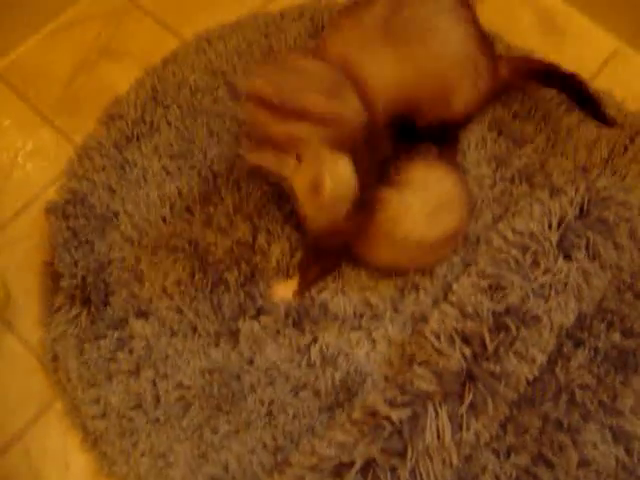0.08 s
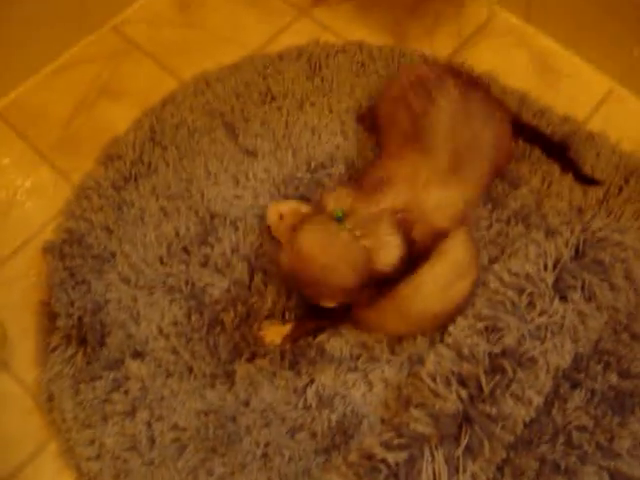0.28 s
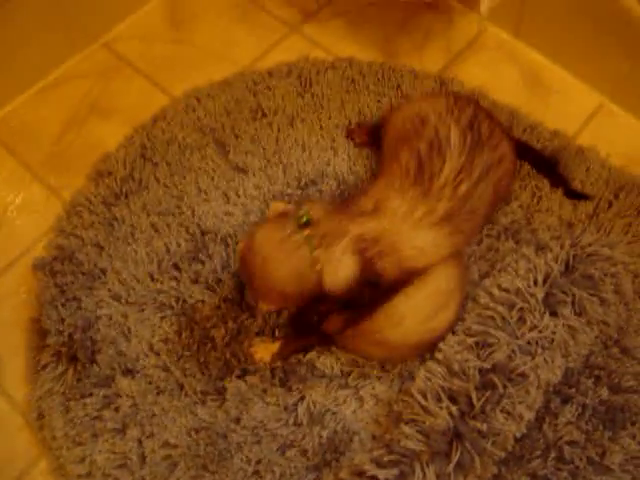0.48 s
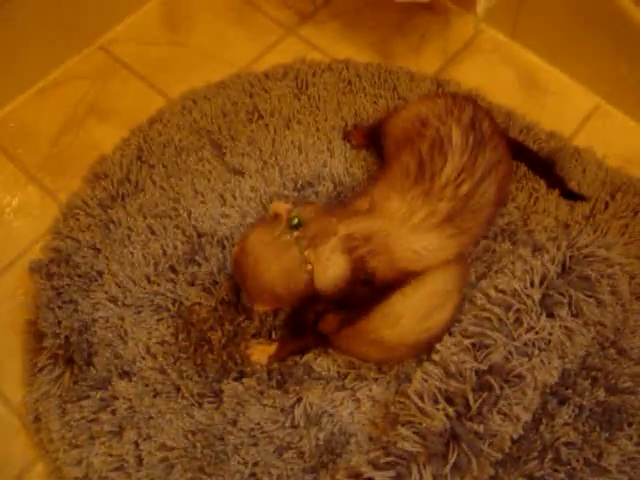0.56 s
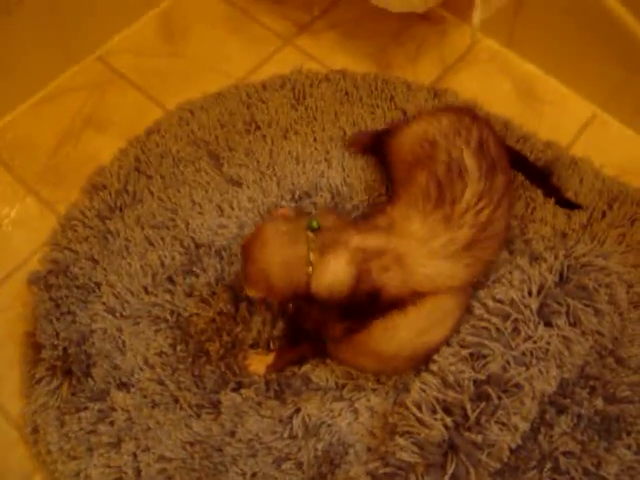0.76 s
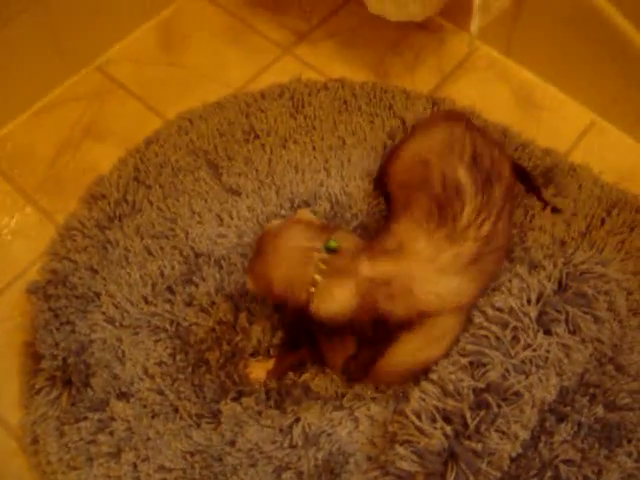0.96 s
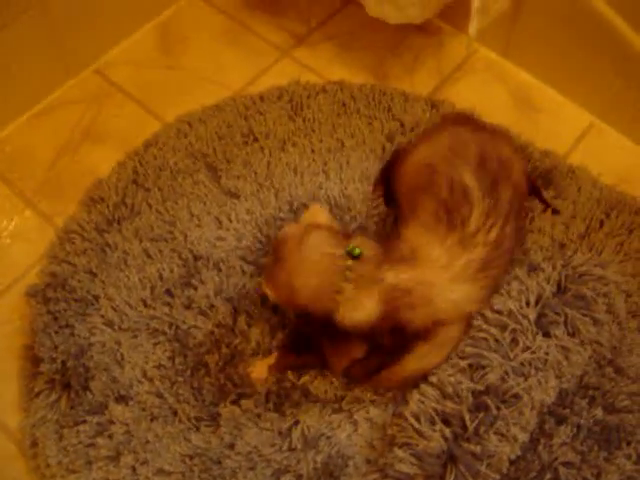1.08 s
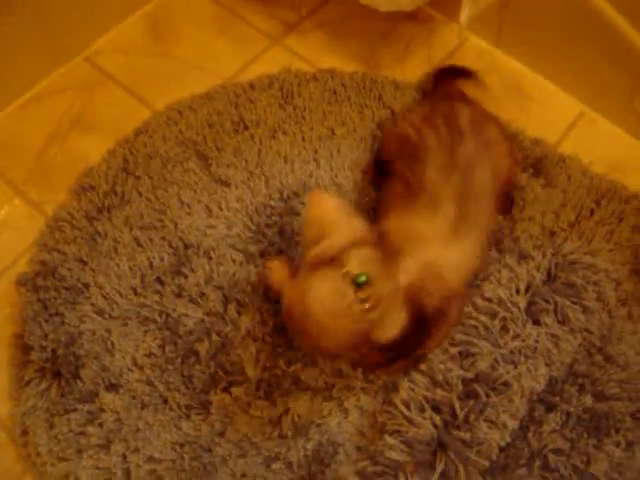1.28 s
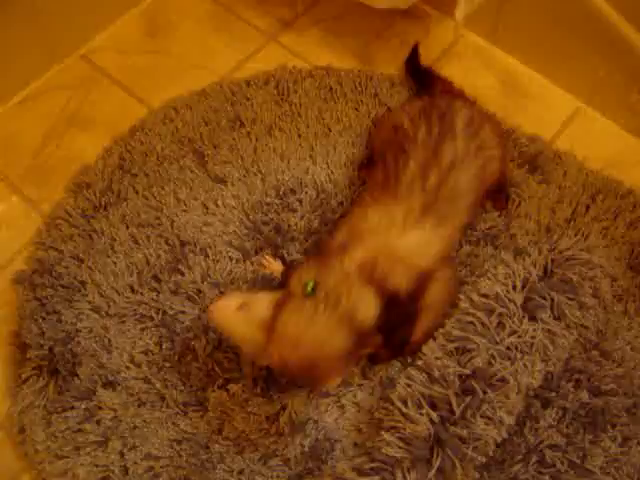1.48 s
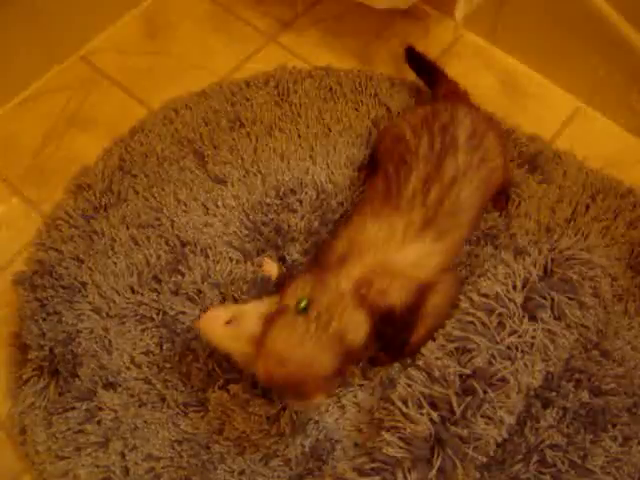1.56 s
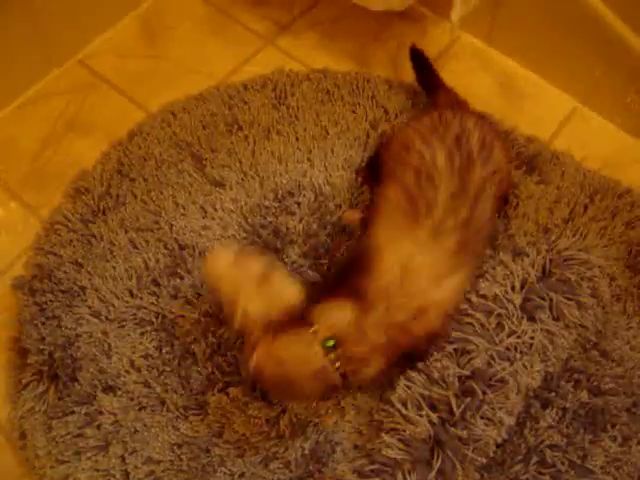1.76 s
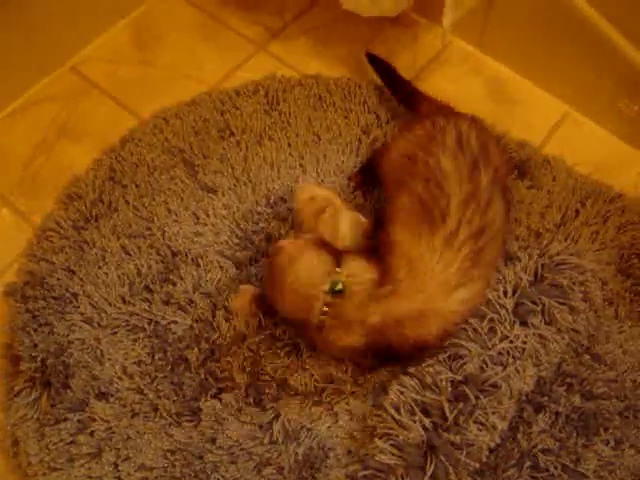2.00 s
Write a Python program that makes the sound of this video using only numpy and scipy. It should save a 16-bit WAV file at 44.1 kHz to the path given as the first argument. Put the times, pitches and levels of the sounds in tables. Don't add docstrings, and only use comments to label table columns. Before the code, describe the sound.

Small high-pitched collar bell rattling in short stifled rings while ferrets wrestle, with one brief squeak

```python
import sys
import numpy as np
from scipy import signal
from scipy.io import wavfile
from scipy.ndimage import uniform_filter1d

SR = 44100
rng = np.random.default_rng(int(sys.argv[2]) if len(sys.argv) > 2 else 0)


def decibels_to_gain(level_db):
    exponent = np.asarray(level_db, float) / 20
    return 10 ** exponent


def digitize_waveform(pressure):
    field = np.atleast_2d(pressure).T
    bounded = np.clip(field, -1, 1)
    quanta = np.round(bounded * 32767).astype(np.int16)
    wavfile.write(sys.argv[1], SR, quanta)


N = 88200


def evened(x):
    return x / np.sqrt(np.mean(x ** 2) + 1e-20)


def add(mix, start_s, sound):
    part = mix[round(start_s * SR):][:len(sound)]
    part += sound[:len(part)]


def resonate(x, hz, width_hz):
    turn = np.exp(2j * np.pi * np.cumsum(hz * np.ones(len(x))) / SR)
    pole = np.exp(-np.pi * width_hz / SR)
    smooth = signal.lfilter([1 - pole], [1, -pole], x / turn + 1e-18)
    return 2 * (turn * smooth).real


def band(x, hz, width_hz):
    return evened(resonate(resonate(x, hz, width_hz), hz, width_hz))


def gate(start_s, length_s, edge_s):
    t = np.arange(N) / SR - start_s
    ramp = np.clip(np.minimum(t, length_s - t) / edge_s + 0.5, 0, 1)
    return np.sin(np.pi / 2 * ramp) ** 2


def hiss():
    # pitch_hz, density_db [dB per Hz]
    colour = [(25, -18.5), (70, -11.5), (250, -1), (900, -6.5), (2000, -11), (5000, -13.5), (9400, -14.5),
              (10200, -21)]
    level_db, patch_db = -57.5, 0.99
    frames, hz = N // 256 + 5, np.fft.rfftfreq(1024, 1 / SR)
    real, imaginary, patches = rng.standard_normal((frames, 513, 3)).T
    patches = uniform_filter1d(patches, size=10, axis=0)
    patches = evened(uniform_filter1d(patches, size=12, axis=1))
    colour_hz, colour_db = np.transpose(colour)
    curve_db = np.interp(np.log(hz + 1), np.log(colour_hz), colour_db)
    spectrum = (real + 1j * imaginary) * decibels_to_gain(curve_db[:, None] + patch_db * patches)
    noise = signal.istft(spectrum, nperseg=1024, noverlap=768)[1][:N]
    return decibels_to_gain(level_db) * evened(noise)


def hum():
    # pitch_hz, width_hz, level_db
    drones = [(119.8, 11, -77), (77.4, 60, -78)]
    # start_s, length_s, extra_db
    tumbles = [
        (.2, .3, 10),
        (1.003, .2, 8.5),
        (1.245, .8, 10.5),
    ]
    drone = sum(decibels_to_gain(db) * band(rng.standard_normal(N), hz, width_hz) for hz, width_hz, db in drones)
    swell_db = sum(extra_db * gate(start_s, length_s, 0.05) for start_s, length_s, extra_db in tumbles)
    return drone * decibels_to_gain(swell_db)


def room(x):
    t60_s, level_db = 0.17, -7.5
    t = np.arange(SR // 2) / SR
    taps = (rng.random(len(t)) < 0.05) * rng.choice([-1., 1.], len(t))
    taps *= decibels_to_gain(-60 * t / t60_s) * (t > 0.004)
    return decibels_to_gain(level_db) * signal.fftconvolve(x, taps / np.linalg.norm(taps))[:N]


def scuffs():
    # start_s, length_s, level_db, centre_hz, width_hz
    contacts = [(0.092, 0.0047, -49.5, 9200, 3020), (0.122, 0.022, -51, 8750, 2500),
                (0.209, 0.022, -44, 9000, 2500), (0.235, 0.024, -50, 400, 295.5),
                (0.264, 0.08, -59, 251, 400), (0.316, 0.028, -58, 834, 420), (0.421, 0.12, -64.5, 301, 600),
                (0.529, 0.052, -58.5, 5400, 4000), (1.422, 0.0068, -53.5, 4570, 4030),
                (1.518, 0.068, -59, 1200, 1540), (1.658, 0.025, -43.5, 462, 1100),
                (1.68, 0.034, -48.5, 330, 710), (1.718, 0.039, -53.5, 218, 500),
                (1.877, 0.01, -45.5, 7220, 1800), (0.125, 0.0017, -46.5, 9300, 2500),
                (0.102, .005, -65, 8700, 2000), (1.917, 0.0083, -65, 7900, 1800),
                (1.955, 0.012, -55, 7150, 1400), (1.994, 0.011, -55, 7450, 2500),
                (1.52, 0.075, -64.5, 2940, 2500)]
    grains_per_s, grain_db = 6000, 2.2
    chance, sign, size = rng.random((len(contacts), N, 3)).transpose(2, 0, 1)
    grains = (chance < grains_per_s / SR) * np.sign(sign - 0.5)
    grains *= decibels_to_gain(-grain_db * np.log(size + 0.0022))
    out = np.zeros(N)
    for grain, (start_s, length_s, db, hz, width_hz) in zip(grains, contacts):
        out += decibels_to_gain(db) * gate(start_s, length_s, 0.49 * length_s) * band(grain, hz, width_hz)
    return signal.sosfilt(signal.butter(2, 140, "high", fs=SR, output="sos"), out)


def claw_ticks():
    # start_s, peak_db
    snags = [
        (0.4364, -36.5),
        (1.4187, -34),
        (1.7185, -46),
    ]
    # pitch_hz, level_db, t60_s
    modes = [(2450, -3.5, 0.013), (3270, -9, 0.013), (3950, -4, 0.0055), (4600, -8.5, 0.0085),
             (5100, -10.5, 0.0097), (7500, -17, 0.0063)]
    t, out = np.arange(1500) / SR, np.zeros(N)
    ring = sum((-1) ** k * decibels_to_gain(db - 60 * t / t60_s) * np.sin(2 * np.pi * hz * t)
               for k, (hz, db, t60_s) in enumerate(modes))
    for start_s, peak_db in snags:
        add(out, start_s, decibels_to_gain(peak_db) * ring / abs(ring).max())
    return out


def whistles():
    # start_s, length_s, level_db, first_hz, last_hz
    breaths = [
        (1.08, .2, -62, 3660, 3540),
        (1.26, .07, -64, 3520, 3380),
        (1.31, .06, -65, 3250, 3180),
        (1.06, .26, -70, 2760, 2600),
        (.62, .26, -70, 1670, 1660),
        (.92, .24, -70, 1670, 1650),
        (1.33, .14, -66, 1610, 1640),
    ]
    width_hz, tone_gain = 110, 1.9
    t, noise = np.arange(N) / SR, rng.standard_normal((len(breaths), N))
    out = np.zeros(N)
    for air, (start_s, length_s, db, first_hz, last_hz) in zip(noise, breaths):
        hz = np.interp(t, [start_s, start_s + length_s], [first_hz, last_hz])
        tone = np.sin(2 * np.pi * np.cumsum(hz) / SR)
        whistle = evened(band(air, hz, width_hz) + tone_gain * tone)
        out += decibels_to_gain(db) * gate(start_s, length_s, 0.039) * whistle
    return out


def hollow_shuffle():
    # time_s, effort_db
    effort = [
        (.532, -78),
        (.542, -53),
        (.554, -49),
        (.576, -55.5),
        (.586, -61),
        (.597, -55.5),
        (.62, -60),
    ]
    # pitch_hz, width_hz, level_db
    hollows = [(680, 150, -8), (1230, 220, -1), (2100, 900, -6)]
    note_hz, note_db = 923.4, 3.5
    time_s, effort_db = np.transpose(effort)
    t = np.arange(time_s[0], time_s[-1], 1 / SR)
    rustle = rng.standard_normal(N)[:len(t)]
    note = decibels_to_gain(note_db) * np.sin(2 * np.pi * note_hz * t)
    huff = sum(decibels_to_gain(db) * band(rustle, hz, width_hz) for hz, width_hz, db in hollows)
    return time_s[0], decibels_to_gain(np.interp(t, time_s, effort_db)) * evened(note + huff)


def squeak():
    # time_s, pitch_hz, effort_db, mouth [0 shut, 1 open], throat_hz
    course = [
        (1.596, 750, -50, .6, 3650),
        (1.599, 730, -36, .4, 3550),
        (1.605, 670, -38, .6, 3350),
        (1.613, 640, -41, .9, 3200),
        (1.625, 644, -44.5, 1.1, 2600),
        (1.634, 663, -35.5, 0, 2700),
        (1.648, 665, -39, -.4, 3250),
        (1.659, 658, -58, .8, 2050),
        (1.69, 655, -68, .8, 1960),
    ]
    harmonics = [0.5, -2, -5, -13, -3.5, -11.5, -24]
    throat_db, throat_width_hz, shut_db_per_order = 8, 450, -5.5
    roughness, onset_noise_s = 0.25, 0.005
    time_s, *rows = np.transpose(course)
    t = np.arange(time_s[0], time_s[-1], 1 / SR)
    hz, effort_db, mouth, throat_hz = (np.interp(t, time_s, row) for row in rows)
    turns = np.cumsum(hz) / SR
    tone = np.zeros(len(t))
    for k, db in enumerate(harmonics, 1):
        shut_db = shut_db_per_order * (k - 1.0) * (1 - mouth)
        lift_db = throat_db / (1 + ((k * hz - throat_hz) / throat_width_hz) ** 2)
        tone -= decibels_to_gain(db + shut_db + lift_db) * np.cos(2 * np.pi * k * turns - k * k / 4)
    puffs = band(np.exp(-(turns % 1) / 0.33) * rng.standard_normal(N)[:len(t)], 2120, 2200)
    puff_gain = roughness + 0.95 * np.exp(-(t - time_s[0]) / onset_noise_s)
    return time_s[0], decibels_to_gain(effort_db) * (tone + puff_gain * puffs)


def bell():
    # start_s, length_s, level_db, pitch_hz
    first_shake = [(0.0204, 0.0041, -50.8, 6660.0), (0.0626, 0.0033, -46.8, 6780.0),
                   (0.191, 0.0049, -41.0, 6750.0), (0.1949, 0.0088, -41.3, 6700.0),
                   (0.2042, 0.0057, -40.0, 6770.0), (0.2089, 0.0033, -42.4, 6760.0),
                   (0.2125, 0.0029, -43.0, 6820.0), (0.2159, 0.0074, -42.2, 6710.0),
                   (0.231, 0.0113, -14.3, 6730.0), (0.2425, 0.0031, -15.5, 6760.0),
                   (0.2547, 0.0022, -45.5, 6700.0), (0.2566, 0.0021, -31.3, 6600.0),
                   (0.2586, 0.0034, -15.8, 6750.0), (0.2616, 0.0145, -21.5, 6700.0),
                   (0.2766, 0.0049, -23.0, 6770.0), (0.2815, 0.003, -23.4, 6760.0),
                   (0.2867, 0.0078, -22.4, 6710.0), (0.2946, 0.003, -23.6, 6770.0),
                   (0.3005, 0.003, -38.3, 7170.0), (0.3027, 0.0024, -41.5, 6720.0),
                   (0.3058, 0.0094, -12.2, 6720.0), (0.3156, 0.0023, -29.8, 6990.0),
                   (0.3198, 0.0044, -12.5, 6750.0), (0.3245, 0.0022, -34.0, 6730.0),
                   (0.3262, 0.0022, -45.9, 6640.0), (0.3327, 0.0042, -27.8, 6670.0),
                   (0.3359, 0.0069, -26.9, 6730.0), (0.3478, 0.0045, -28.5, 6760.0),
                   (0.3527, 0.0022, -50.7, 6730.0), (0.3548, 0.0048, -47.0, 6400.0),
                   (0.362, 0.0078, -27.4, 6710.0), (0.3709, 0.0047, -35.8, 6660.0),
                   (0.3759, 0.0064, -36.5, 6740.0), (0.3829, 0.0067, -36.1, 6700.0),
                   (0.3886, 0.0087, -35.3, 6730.0), (0.4047, 0.0029, -41.4, 6760.0),
                   (0.4103, 0.0052, -39.5, 6700.0), (0.4152, 0.0028, -53.8, 7030.0),
                   (0.4193, 0.0033, -41.8, 6750.0), (0.442, 0.0065, -51.9, 6720.0),
                   (0.4475, 0.0038, -52.7, 6740.0), (0.453, 0.0033, -51.1, 6820.0),
                   (0.4583, 0.0034, -54.2, 6750.0), (0.4615, 0.003, -53.7, 6770.0),
                   (0.4816, 0.0031, -53.7, 6770.0), (0.5096, 0.003, -49.8, 6820.0)]
    # start_s, length_s, level_db
    later_shakes = [(1.2298, 0.0059, -24.5), (1.2365, 0.0054, -51), (1.2402, 0.0051, -27.5),
                    (1.2468, 0.0035, -28.5), (1.2504, 0.0092, -30), (1.2602, 0.0021, -44),
                    (1.2625, 0.0022, -53), (1.2649, 0.0023, -28.5), (1.2692, 0.0023, -38),
                    (1.273, 0.0089, -43), (1.2916, 0.01, -42), (1.3018, 0.0081, -43), (1.312, 0.0031, -40),
                    (1.3158, 0.0075, -43), (1.3251, 0.0045, -42.4), (1.3428, 0.0044, -44.9),
                    (1.3739, 0.0046, -42.6), (1.3793, 0.0049, -53), (1.384, 0.0057, -53),
                    (1.4208, 0.0026, -35), (1.4288, 0.0041, -40), (1.434, 0.0034, -47),
                    (1.4642, 0.0026, -53.8), (1.467, 0.0064, -36.5), (1.5064, 0.0046, -46),
                    (1.5112, 0.0039, -41), (1.516, 0.0038, -44.0), (1.5198, 0.0039, -45.8),
                    (1.5345, 0.0023, -42), (1.5356, 0.0071, -46.5), (1.582, 0.0024, -43),
                    (1.5978, 0.0028, -34), (1.6, 0.0058, -35.5), (1.6282, 0.0037, -49),
                    (1.6326, 0.0039, -55), (1.6367, 0.01, -57.5), (1.6478, 0.0021, -49),
                    (1.6507, 0.0034, -52),
                    (1.772, 0.0061, -49.5), (1.781, 0.0083, -47.5), (1.7992, 0.0033, -49),
                   (1.8464, 0.0127, -49), (1.8637, 0.003, -49.4), (1.8683, 0.0047, -49.1),
                   (1.8757, 0.0032, -46), (1.8793, 0.0024, -45), (1.8828, 0.0034, -51),
                   (1.886, 0.0023, -47.3), (1.8878, 0.0026, -46.9), (1.892, 0.0088, -50),
                   (1.903, 0.003, -48), (1.9056, 0.0027, -48), (1.9086, 0.0029, -48), (1.9122, 0.0057, -48),
                   (1.9193, 0.0037, -44), (1.9212, 0.0038, -49), (1.9243, 0.0055, -50),
                   (1.9282, 0.017, -50.5), (1.9456, 0.003, -51.8), (1.9562, 0.0034, -45),
                   (1.9606, 0.0047, -48.4), (1.97, 0.014, -50), (1.985, 0.003, -50), (1.9938, 0.0021, -53),
                   (1.9954, 0.0023, -36)]
    # start_s, length_s, level_db
    faint_rings = [
        (1.144, .0046, -56),
        (1.555, .008, -59),
        (1.568, 0.012, -59),
        (1.671, 0.0059, -55),
        (1.679, 0.013, -57.5),
        (1.745, .019, -63),
        (1.809, 0.007, -54),
    ]
    bell_hz, short_ring_hz, short_ring_s, edge_s = 6710, 70.4, 0.0056, 0.002
    rattle_db, rattle_hz, rattle_width_hz = -19, 6850, 400
    chink_db, chink_hz, chink_width_hz, skirt_db = -24, 7350, 1250, -12
    chink_share, chink_spread_s = 0.81, 0.004
    noise = rng.standard_normal((4, N))
    rattle = resonate(noise[0], rattle_hz, rattle_width_hz)
    rattle = decibels_to_gain(rattle_db) * band(rattle, rattle_hz, rattle_width_hz)
    chink = band(noise[1], chink_hz, chink_width_hz) + decibels_to_gain(skirt_db) * band(noise[2], 5980, 470)
    chink *= decibels_to_gain(3 * evened(uniform_filter1d(noise[3], size=150)) - 1)
    t, out = np.arange(N) / SR, np.zeros(N)
    for start_s, length_s, db, *bent in first_shake + later_shakes + faint_rings:
        hz = bent[0] if bent else bell_hz + short_ring_hz * np.exp(-length_s / short_ring_s)
        tone = np.sqrt(2) * np.sin(2 * np.pi * hz * (t - start_s))
        ring_gate = gate(start_s + edge_s / 3, length_s - edge_s / 2, edge_s)
        chink_gate = gate(start_s - chink_spread_s / 2, length_s + chink_spread_s, chink_spread_s)
        out += decibels_to_gain(db) * ring_gate * (tone + rattle)
        out += decibels_to_gain(chink_db + chink_share * db) * chink_gate * chink
    return out


def scene():
    near = scuffs() + claw_ticks()
    add(near, *squeak())
    add(near, *hollow_shuffle())
    return (near + room(near) + whistles() + bell() + hiss() + hum())[None]


def roll_off(x):
    return signal.sosfilt(signal.butter(12, 10650, fs=SR, output="sos"), x)


def record(dry):
    # start_s, length_s, low_hz, high_hz
    dropouts = [
        (0.037, 0.014, 5800, 7500),
        (0.082, 0.019, 7200, 11000),
        (0.248, 0.0082, 5260, 11000),
        (0.43, 0.009, 5180, 11000),
        (0.47, 0.0087, 6600, 8000),
        (1.2, 0.023, 5770, 10900),
        (1.614, 0.0076, 5800, 11000),
        (1.844, 0.035, 7400, 8900),
    ]
    # start_s, length_s
    starved = [
        (0, .62),
        (1.27, .75),
    ]
    drop_db, hole_share, holes_from_hz, quiet_db = -30, 0.16, 4900, -72
    hz, t, z = signal.stft(dry, SR, nperseg=256, noverlap=192)
    at = np.minimum(t * SR, N - 1).astype(int)
    lost = sum(np.outer((hz > low_hz) & (hz < high_hz), gate(start_s, length_s, 0.0023)[at])
               for start_s, length_s, low_hz, high_hz in dropouts)
    dice = np.kron(rng.random((len(t) // 8 + 1, 33)).T, np.ones((4, 8)))[:len(hz), :len(t)]
    local = uniform_filter1d(uniform_filter1d(abs(z[0]), size=8, axis=1), size=4, axis=0)
    spans = sum(gate(start_s, length_s, 0.01)[at] for start_s, length_s in starved)
    holes = (dice < hole_share) * (local < decibels_to_gain(quiet_db)) * np.outer(hz > holes_from_hz, spans)
    z = z * decibels_to_gain(drop_db * np.minimum(lost + holes, 1))
    kept = signal.istft(z, SR, nperseg=256, noverlap=192)[1][:, :N]
    kept = signal.oaconvolve(kept, signal.firwin(201, 10200, fs=SR)[None], "same")
    return roll_off(kept)


dry = scene()
out = record(dry)
digitize_waveform(out)
```